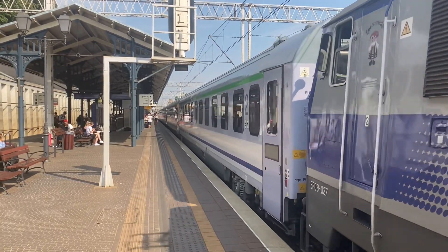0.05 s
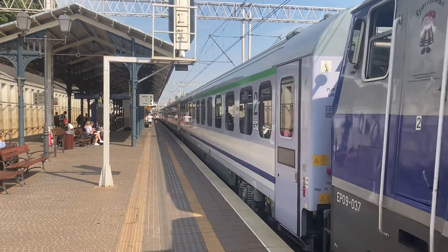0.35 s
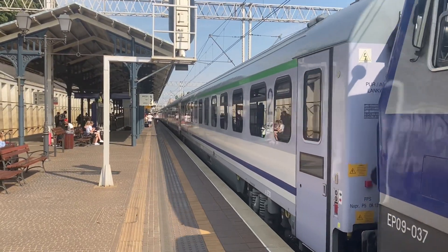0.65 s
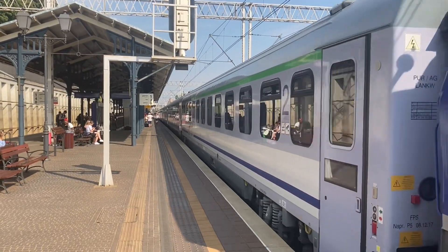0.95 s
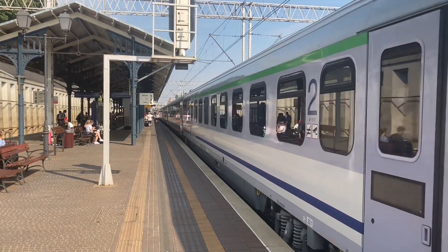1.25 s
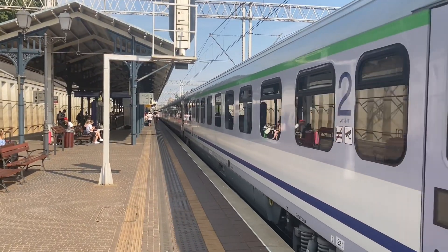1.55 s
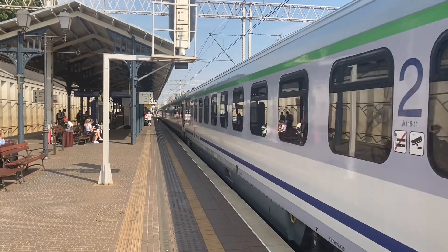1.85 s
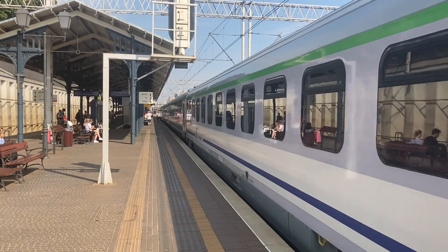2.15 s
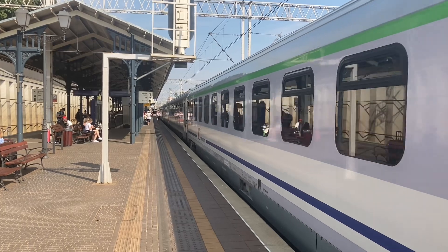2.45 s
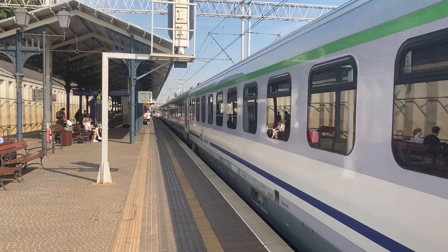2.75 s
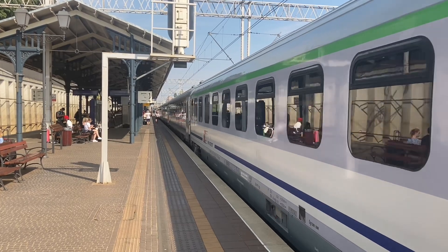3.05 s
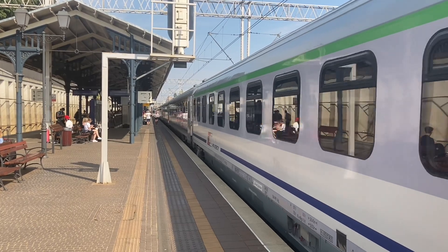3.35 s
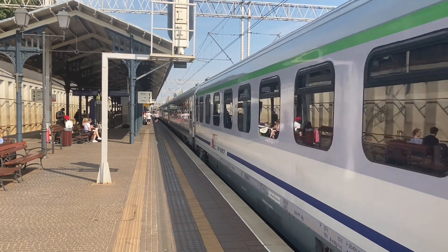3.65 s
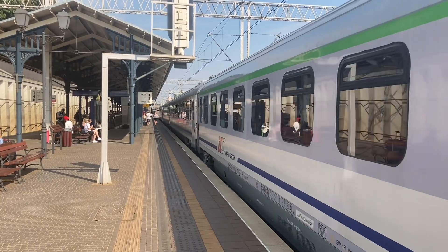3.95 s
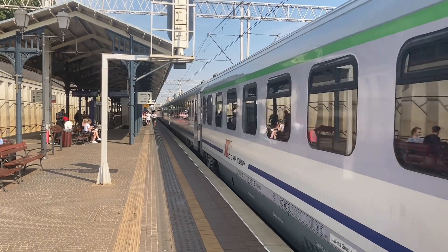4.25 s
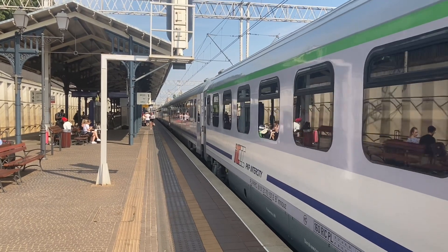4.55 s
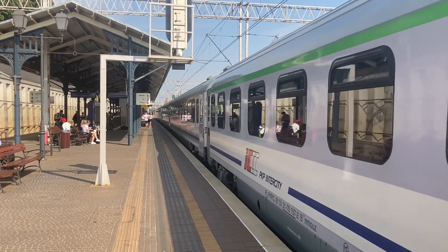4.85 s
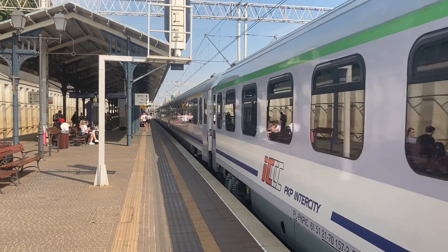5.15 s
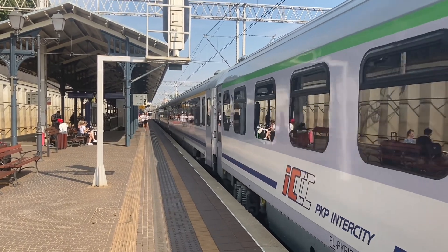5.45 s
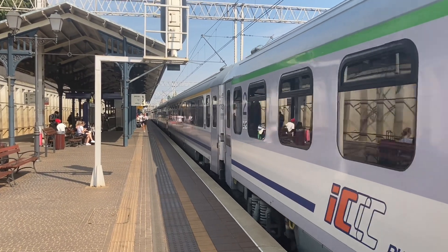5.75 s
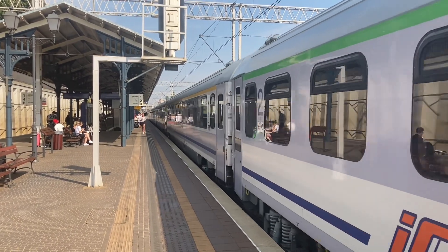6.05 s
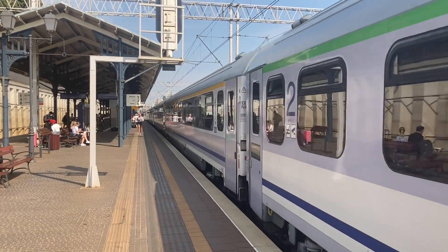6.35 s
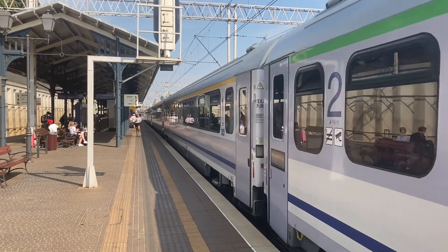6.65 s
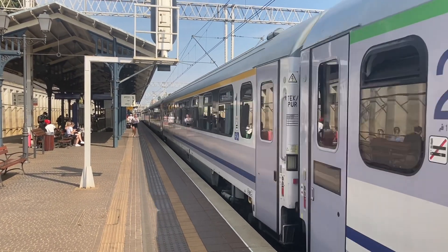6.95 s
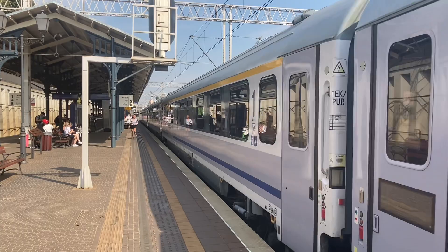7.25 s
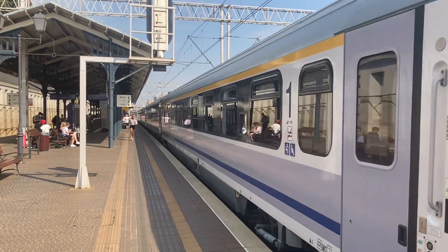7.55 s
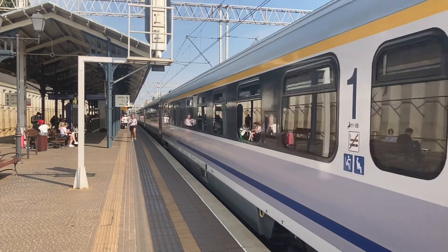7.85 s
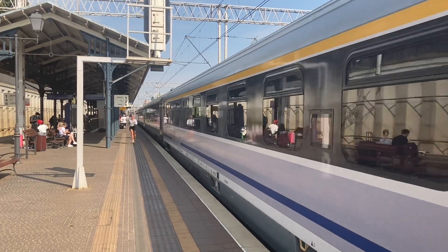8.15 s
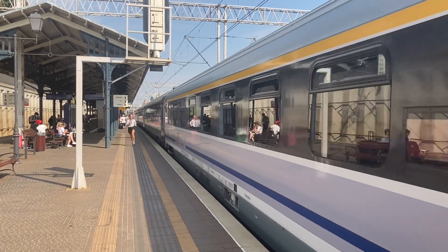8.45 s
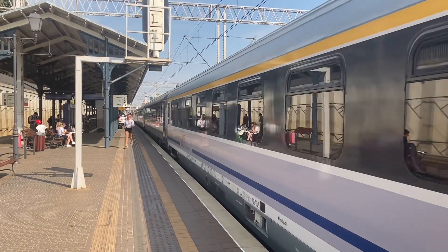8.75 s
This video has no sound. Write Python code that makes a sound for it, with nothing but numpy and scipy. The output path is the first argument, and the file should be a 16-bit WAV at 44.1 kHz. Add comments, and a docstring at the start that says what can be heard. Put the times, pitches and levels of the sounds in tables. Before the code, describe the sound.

Heard in stereo from the platform edge, a passenger train pulls out behind an electric locomotive. First come roaring, whining cooling blowers, with thuds and a brief clatter from the wheels. The roar fades into the softer rumble and rush of coaches, while the motor hum slowly rises and faint electrical tones drift past. Short, gritty wheel squeaks and another rattle come in the last seconds.

```python
"""An electric locomotive pulls a passenger train out of a station, a step from the listener.
First come the air roar and the beating blade tones of two cooling blowers, with knocks and a clatter
as wheels strike flaws in the rail. The locomotive recedes, and the hum of its motors climbs through
the resonances of its body. The coaches follow with rolling rumble and the thin, sinking tones of their
converters. In the last seconds flanges rub the rail and chirp, and the bogies knock and rattle again."""
import sys
import numpy as np
from scipy import signal
from scipy.fft import rfft, irfft, next_fast_len
from scipy.io import wavfile
from scipy.ndimage import uniform_filter1d

SR = 44100
rng = np.random.default_rng(int(sys.argv[2]) if len(sys.argv) > 2 else 0)


def materialize(psi):
    """Save the field psi as 16-bit PCM at rate SR to the path in sys.argv[1].

    A 1-D psi becomes a single channel; in a 2-D psi each row is a channel.
    """
    bounded = np.clip(np.atleast_2d(psi).T, -1, 1)
    quanta = np.round(bounded * 32767).astype(np.int16)
    wavfile.write(sys.argv[1], SR, quanta)


N = 397341
TIME = np.arange(N) / SR
FFT_SIZE = next_fast_len(N)
BIN_HZ = np.maximum(np.arange(FFT_SIZE // 2 + 1) * SR / FFT_SIZE, 1)
METRES_PER_CYCLE = .054  # travel of the train per cycle of the drive's fundamental

# How sound from the track reaches two microphone ports. Each row: frequency in Hz, coherence from
# 0 to 1, phase lead of the left in radians, left minus right level in dB.
PORT_RESPONSE = [(70, .93, -.16, 2.4), (180, .92, -.52, .3), (330, .72, -1.3, -1.1),
                 (600, .66, -2.41, -3.6), (1000, .67, -2.58, -1.8), (1600, .7, -3.45, 1.7),
                 (2200, .28, -5.1, .6), (3000, .1, -6.5, -1.3), (3800, .15, -9.6, .2),
                 (4700, .35, -6.8, .2), (6400, .35, -9.8, -1), (8000, .85, -6.3, 0), (11400, .85, 0, 0),
                 (14700, .85, 6.3, 0)]


def from_db(db):
    """Amplitude ratio for a level in decibels."""
    return 10 ** (np.asarray(db) / 20)


def unit_rms(x):
    """A signal normalised to a mean power of 1."""
    return x / np.sqrt(np.mean(np.abs(x) ** 2) + 1e-20)


def in_time(rows):
    """Linear interpolation of each column of a curve table to every sample."""
    seconds, *columns = np.transpose(rows)
    return [np.interp(TIME, seconds, column) for column in columns]


def at_hz(rows, hz):
    """Interpolation of each column of a spectrum table along a logarithmic frequency axis."""
    points_hz, *columns = np.transpose(rows)
    return [np.interp(np.log(hz), np.log(points_hz), column) for column in columns]


def drift(rate_hz, size=N):
    """Low-pass filtered noise: a random fluctuation with rms near 1."""
    step, settling = 40, 2000  # samples per coarse step; steps for the filter to settle
    pole = np.exp(-2 * np.pi * rate_hz * step / SR)
    white = rng.standard_normal(size // step + settling + 2)
    slow = signal.lfilter([1], [1, -2 * pole, pole * pole], white)[settling:]
    return np.interp(np.arange(size) / step, np.arange(len(slow)), unit_rms(slow))


def scatter(rate_hz, size=N):
    """Multipath fading: many shifting reflections sum to a complex gain of rms 1 at each port."""
    return np.array([drift(rate_hz, size) + 1j * drift(rate_hz, size) for port in range(2)]) / np.sqrt(2)


def phasor(hz):
    """Phase is the integral of frequency; it starts at random, and the real part has rms 1."""
    return np.sqrt(2) * np.exp(2j * np.pi * (np.cumsum(hz) / SR + rng.random()))


def port_gains(hz):
    """Differences of phase and level give direction: a complex gain for the left and right port."""
    _, lead_rad, pan_db = at_hz(PORT_RESPONSE, hz)
    left = from_db(pan_db / 2) * np.exp(.5j * lead_rad)
    return np.array([left, 1 / left]).reshape(2, -1)


def bell(x, centre, half_width):
    """A flat-topped peak of height 1 that falls to one half at half_width from its centre."""
    return 1 / (1 + np.square(np.square((x - centre) / half_width)))


def drive_hz(start_hz=53.9, rise_hz_per_s=5.43):
    """Uniform acceleration: the drive is tied to the wheels, so its fundamental rises linearly."""
    return start_hz + rise_hz_per_s * TIME


def travelled_m():
    """Distance is the integral of speed: how far the locomotive has moved past the listener."""
    return METRES_PER_CYCLE * np.cumsum(drive_hz()) / SR


def noise_spectrum(colour, focus):
    """Partly coherent noise at the two ports; a close source (focus over 1) is more coherent."""
    coherence = np.clip(at_hz(PORT_RESPONSE, BIN_HZ)[0], .01, .99) ** (1 / focus)
    white = rfft(rng.standard_normal((3, FFT_SIZE)))
    pair = np.sqrt(coherence) * white[0] + np.sqrt(1 - coherence) * white[1:]
    low_cut = 1 / np.sqrt(1 + (22 / BIN_HZ) ** 6)
    return pair * port_gains(BIN_HZ) * from_db(at_hz(colour, BIN_HZ)[0]) * low_cut


def noise_band(spectrum, low_hz, high_hz):
    """Band-pass filtering with soft edges turns a spectrum into a noise of rms 1."""
    gain = 1 / np.sqrt((1 + (low_hz / BIN_HZ) ** 12) * (1 + (BIN_HZ / high_hz) ** 12))
    return unit_rms(irfft(spectrum * gain, FFT_SIZE)[:, :N])


def roar_and_rolling():
    """Incoherent sources add in power: the locomotive's air roar gives way to the coaches' wheels."""
    # Noise colours of locomotive and coaches. Each row: frequency in Hz, relative density in dB.
    loco_colour = [(25, -40), (45, 3), (75, 14), (170, -1.5), (230, -4), (370, -3), (680, 3.5),
                   (1200, -9.5), (2000, -16), (3000, -28.5), (4600, -37), (6800, -49.5), (9500, -53),
                   (14500, -58)]
    coach_colour = [(25, -30), (45, -6.5), (70, 2), (170, -3), (290, -8), (400, -11), (600, -10.5),
                    (930, -13), (1150, -18), (1900, -23), (2800, -33), (4800, -44), (6300, -50.5),
                    (13000, -64)]
    # Platform shudder, ground rumble, bogie drone, rail roar, wheel rush, rail hiss and air hiss.
    # Each row: lower and upper edge in Hz, base levels of locomotive and wheels in dB, fade of the
    # wheels in dB per metre.
    bands = [(28, 48, -35, -45, -0.07), (64, 106, -37, -29, 0.17), (131, 355, -23.5, -28.5, 0.1133),
             (346, 968, -27.5, -32, 0.1), (1144, 3470, -31.5, -37.5, 0.0926),
             (3710, 6580, -43.5, -47.5, 0.1644), (7220, 13800, -50, -61, 0.13)]
    # The wheel noise swells or dips as running gear goes by. Each row: time of closest approach in
    # seconds, half duration in seconds, change of the rumble in dB, change of the rush in dB.
    swells = [(.07, .12, 4.5, 2), (0.43, 0.13, 4.5, -3.5), (1.45, 0.17, -3, -0.5), (1.955, 0.49, 1, 1.14),
              (3.75, 0.21, 1, -.5), (5.155, 0.59, -0.5, 0.9), (7.4, 0.32, 0, 0), (7.863, 0.2, -4.5, -0.5),
              (8.405, 1, 2, 1.6)]
    loco, coach = noise_spectrum(loco_colour, focus=1.7), noise_spectrum(coach_colour, focus=0.93)
    rumble_db = sum(db * bell(TIME, nearest_s, half_s) for nearest_s, half_s, db, _ in swells)
    rush_db = sum(db * bell(TIME, nearest_s, half_s) for nearest_s, half_s, _, db in swells)
    metres, out = travelled_m(), 0
    for low_hz, high_hz, loco_db, wheels_db, fade_db_per_m in bands:
        # The hiss holds longer than the roar, then the first coach shuts it off.
        half_power_m, falloff = (2.75, 3.9) if low_hz > 3400 else (2.51, 3.14)
        loco_gain = from_db(loco_db) / np.sqrt(1 + (metres / half_power_m) ** falloff)
        swell_db = rumble_db if high_hz < 120 else rush_db
        wheels_gain = from_db(wheels_db - fade_db_per_m * metres + swell_db)
        level = np.hypot(loco_gain, wheels_gain)
        roar = loco_gain * noise_band(loco, low_hz, high_hz)
        wheels = wheels_gain * noise_band(coach, low_hz, high_hz)
        noise = (roar + wheels) / level
        power = uniform_filter1d(np.mean(noise ** 2, axis=0), size=SR // 10)
        steady_noise = noise / np.sqrt(uniform_filter1d(power, size=SR // 12))
        # Rough wheel treads make the low bands lumpy; the rush stays smoother.
        tread_db = 1.5 if high_hz < 400 else .65
        out = out + steady_noise * level * from_db(tread_db * drift(rate_hz=18.4))
    return out


def blade_tone(hz, centre_db, sideways_db, flutter):
    """Turbulence modulates a blade tone; its sideways part puts the two ports out of phase."""
    arrival = from_db(centre_db) + 1j * from_db(sideways_db) * np.array([[-1], [1]])
    return np.real(phasor(hz) * arrival * unit_rms(1 + flutter * scatter(rate_hz=15)[0]))


def blowers(centre_trim_db=-1.3, sideways_trim_db=-.5, octave_trim_db=-1.2):
    """Beating: two blowers turn at slightly different speeds; the first also sounds its octave."""
    # Blade-passing frequencies. Each row: time in seconds, first blower in Hz, second blower in Hz.
    blade_hz = [(0, 449.6, 463.5), (1.15, 450, 464.5), (1.65, 466, 483), (2.5, 475.5, 491.5),
                (3.5, 475.5, 494), (4.35, 485.5, 503), (5.4, 483, 501), (6.4, 476, 494),
                (7.55, 467.5, 488.5), (8.2, 472.5, 491), (9, 473, 491)]
    # The first blower's tone swells and fades as reflections cross: its part alike at both ports
    # and its part arriving sideways. Each row: time in seconds, relative level in dB.
    first_centre = [(0.0, -26), (.12, -25.5), (.22, -34), (.38, -46), (.51, -29), (.6, -37), (.7, -28),
                    (.78, -35), (.87, -29), (1.06, -32), (1.38, -50), (1.6, -34), (2.24, -34.5),
                    (2.36, -27), (2.48, -42), (2.6, -27.5), (2.96, -34), (3.15, -28.5), (3.24, -46),
                    (3.36, -35), (4.04, -47), (4.24, -30), (4.32, -42), (4.45, -31), (4.56, -39.5),
                    (4.76, -27.5), (5.02, -48), (5.5, -29), (5.72, -27), (5.8, -46), (5.96, -26.5),
                    (6.08, -44), (6.24, -31), (6.44, -43), (6.56, -33), (6.7, -42), (6.8, -33), (6.92, -44),
                    (7.14, -30.5), (7.36, -34.5), (7.46, -47), (7.76, -32), (7.84, -45.5), (7.92, -33.5),
                    (8.12, -44.5), (9.0, -44)]
    first_sideways = [(0.0, -20), (0.42, -33), (.95, -26), (1.38, -37), (1.88, -23), (2.15, -24),
                      (2.5, -35), (2.65, -31.5), (3.3, -31), (3.5, -36), (3.63, -25), (3.72, -35),
                      (3.86, -25), (4.0, -37), (4.16, -42), (4.44, -22), (4.57, -33), (4.88, -27),
                      (5.02, -42), (5.38, -28), (5.58, -43), (5.73, -25), (5.85, -46), (6.05, -35),
                      (6.37, -44), (6.55, -31), (7.2, -46), (7.45, -35), (7.85, -41), (7.93, -32),
                      (8.06, -33), (8.42, -43), (8.6, -34), (9.0, -40)]
    # Its octave and the second blower's tone. Each row: time in seconds, relative level alike at
    # both ports in dB, relative level arriving sideways in dB.
    octave_levels = [(0.0, -42, -30), (.09, -35, -22.5), (0.3, -32, -26), (0.42, -42, -33), (.8, -48, -35),
                     (1.2, -52, -39), (1.72, -54, -50), (1.86, -37.5, -35.5), (2.04, -56, -48),
                     (2.17, -37.5, -37), (2.46, -52, -40), (2.7, -37.5, -42), (2.86, -48, -48),
                     (2.96, -42, -46), (3.08, -52, -50), (3.24, -41, -35.5), (3.32, -47, -46),
                     (3.42, -41, -35.5), (3.54, -52, -48), (3.66, -44, -43), (3.85, -56, -50),
                     (5.4, -54, -54), (5.65, -56, -40), (5.8, -58, -52), (6.3, -56, -50), (6.52, -45, -46),
                     (6.68, -56, -52), (6.82, -45, -48), (7.08, -54, -39), (7.25, -54, -52),
                     (7.55, -54, -45), (7.72, -44, -44), (7.95, -57, -52), (8.16, -42.5, -42),
                     (8.3, -53, -42), (8.7, -54, -44), (8.82, -41, -36), (9.0, -46, -46)]
    second_levels = [(0, -38, -27), (.2, -38, -25), (1.1, -46, -38), (1.27, -42, -29.5), (1.9, -44, -44),
                     (2.25, -39.5, -33), (2.7, -43, -48), (3.07, -44, -34), (3.35, -39, -40),
                     (4.1, -49, -34), (4.7, -38, -34.5), (4.88, -46, -43), (5.14, -48, -33),
                     (5.6, -39, -43), (5.95, -52, -49), (6.25, -36.5, -36), (6.6, -46, -42),
                     (6.85, -37, -37), (7.08, -39, -34), (7.45, -46, -48), (8.1, -50, -36), (8.5, -41, -40),
                     (9, -50, -41)]
    # Apparent direction of the two fundamentals. Each row: time in seconds, left minus right in dB.
    direction = [(0, -0.5), (1.9, 0), (2.35, 6.5), (3.1, 2.5), (3.55, -2), (4.8, -2), (5.7, -1), (6.5, 0),
                 (9, 0)]
    first_hz, second_hz = (hz * (1 + 0.00078 * drift(rate_hz=2.66)) for hz in in_time(blade_hz))
    centre_db = in_time(first_centre)[0] + centre_trim_db
    sideways_db = in_time(first_sideways)[0] + sideways_trim_db
    first = blade_tone(first_hz, centre_db, sideways_db, flutter=.3)
    octave = from_db(octave_trim_db) * blade_tone(2 * first_hz, *in_time(octave_levels), flutter=.6)
    second = blade_tone(second_hz, *in_time(second_levels), flutter=.3)
    pan = from_db(in_time(direction)[0] * np.array([[.5], [-.5]]))
    return octave + (first + second) * pan


def traction_drive(waver_db=1.1, flutter=.4):
    """Resonance: the rising harmonics of motors and gears boom in each body mode they cross."""
    # Harmonics from the fundamental up. Each row: base level in dB, fade in dB per metre.
    harmonics = [(-36, 0.05), (-35.5, 0.1), (-30.5, 1), (-44.5, 0.04)]
    # Resonances of the body. Each row: centre in Hz, half width in Hz, boost in dB.
    resonances = [(74.4, 1.2, 7.5), (88.7, 1.8, 5), (94.3, 1.3, 9.5), (115, 0.9, 8), (127.5, 1.9, 3),
                  (136.6, 2.4, 9), (164, 8.6, 6), (177.6, 2.2, 2.5), (192, 4.2, 1.7), (222.1, 6.8, 10.5)]
    metres, out = travelled_m(), 0
    for order, (base_db, fade_db_per_m) in enumerate(harmonics, 1):
        hz = order * drive_hz()
        boom_db = sum(db * bell(hz, centre_hz, half_hz) for centre_hz, half_hz, db in resonances)
        level = from_db(base_db - fade_db_per_m * metres + boom_db + waver_db * drift(rate_hz=0.86))
        hum = phasor(hz) * port_gains(hz.mean())
        shake = unit_rms(1 + flutter * scatter(rate_hz=7)[0])  # jolts of the track
        out = out + level * np.real(hum * shake)
    return out


def narrow_tone(hz, width_hz, gain, diffuse):
    """Interference: a wandering tone arrives directly and by reflections of relative size diffuse."""
    out, audible = np.zeros((2, N)), gain > gain.max() / 200
    size = audible.sum()
    tone = phasor(np.broadcast_to(hz, N)[audible] + .5 * width_hz * drift(width_hz, size))
    arrival = unit_rms(port_gains(np.mean(hz)) + diffuse * scatter(width_hz, size))
    out[:, audible] = gain[audible] * np.real(tone * arrival)
    return out


def passing_tones(glide_s=.9, sound_m_per_s=343):
    """Doppler effect: each tone swells as its source comes near and sinks in pitch as it goes by."""
    # Tones of converters, fans and panels, and near 8.2 s the scrape of wheels at about 1.8 and # 2.4 kHz. Each
    # row: time of closest approach in seconds, half duration in seconds, frequency in Hz, # width in Hz, peak
    # level in dB.
    tones = [(0.18, 0.27, 1337, 15, -52), (.15, .14, 730, 11.5, -36), (0.297, 0.33, 2350, 320, -43.5),
             (0.91, 0.08, 357, 18, -26.5), (.62, .15, 550, 19.4, -30), (0.9, 0.0405, 315, 10, -27.5),
             (0.79, 0.27, 4200, 122, -48), (.88, 0.19, 4100, 200, -50), (1.27, .1, 680, 50, -34.5),
             (0.93, 0.4, 2090, 520, -38), (1.898, .55, 1616, 600, -42), (2.294, 1, 4640, 390, -53.5),
             (4.099, 1.9, 4810, 304, -56.5), (4.2, .3, 4000, 90, -64), (8.9, .08, 4700, 390, -57),
             (4.902, 1.02, 3000, 17, -58), (5.0, 0.56, 1524, 7.7, -55), (5.9, .9, 5200, 8, -67),
             (5.5, 1.1, 14500, 220, -67.5), (6.04, .93, 149, 1.16, -38.5), (6.906, 2.0, 240.5, 2.7, -43.5),
             (8.202, .8, 1842, 40, -53), (8.63, .13, 203, 7.5, -32), (8.199, 0.51, 2360, 199, -52)]
    mach, out = METRES_PER_CYCLE * drive_hz() / sound_m_per_s, 0
    for nearest_s, half_s, hz, width_hz, level_db in tones:
        doppler = 1 - mach * (TIME - nearest_s) / np.hypot(TIME - nearest_s, glide_s)
        gain = from_db(level_db) * bell(TIME, nearest_s, half_s)
        out = out + narrow_tone(hz * doppler, width_hz, gain, diffuse=1.07)
    return out


def clatters(contacts_per_s=900, ring_band_hz=(430, 1400)):
    """Shot noise: after a jolt, loose brake rigging makes a dying shower of small metal contacts."""
    # Jolts of the rigging. Each row: start in seconds, level in dB, time to fall 60 dB in seconds.
    jolts = [(.293, -26, .1), (7.668, -35, .25), (7.733, -28, .42)]
    envelope = sum(from_db(db - 60 * np.maximum(TIME - start_s, 0) / t60) * (TIME >= start_s)
                   for start_s, db, t60 in jolts)
    contacts = (rng.random(FFT_SIZE) < contacts_per_s / SR) * rng.standard_normal(FFT_SIZE)
    paths = port_gains(BIN_HZ) + scatter(0.11, len(BIN_HZ))  # direct sound plus reflections
    shower = irfft(rfft(contacts) * paths, FFT_SIZE)[:, :N]
    band = signal.butter(4, ring_band_hz, "band", fs=SR, output="sos")
    return signal.sosfilt(band, envelope * shower + 1e-18) / np.std(signal.sosfilt(band, shower))


def knocks(contact_s=0.004):
    """Impact excitation: a wheel jolts over a flaw in the rail and the bogie's damped modes ring."""
    # Wheel impacts. Each row: start in seconds, relative level in dB, treble roll-off corner in Hz.
    impacts = [(0.294, -26, 1820), (0.443, -6.5, 258), (0.508, -5, 150), (.905, -8, 200), (1.774, -16, 320),
               (5.462, -9, 125), (7.674, -28, 1510), (7.733, -25.5, 2200), (7.775, -30, 2200),
               (8.018, -10, 135)]
    # Bogie modes. Each row: frequency in Hz, relative level in dB, time to fall 60 dB in seconds.
    modes = [(69, -11, 0.055), (130, -5, 0.12), (155, 4, 0.082), (323, -6, 0.13), (473, -2, 0.25),
             (696, -4, 0.22), (921, 5, 0.15), (1240, -17, .18), (1730, -14, .2), (2330, -21, 0.22)]
    out, age = np.zeros((2, N)), np.arange(SR // 2) / SR
    attack = 1 - np.exp(-age / contact_s)
    for start_s, level_db, corner_hz in impacts:
        ring = 0
        for (hz, mode_db, t60), phase in zip(modes, rng.random(len(modes))):
            envelope = from_db(level_db + mode_db - 60 * age / t60) / (1 + (hz / corner_hz) ** 2)
            ring = ring + envelope * np.real(port_gains(hz) * np.exp(2j * np.pi * (hz * age + phase)))
        start = int(start_s * SR)
        out[:, start:start + len(age)] += (ring * attack)[:, :N - start]
    return out


def flange_squeals(trim_db=-4.8, grit_db=-4, flicker_db=2.5, slips_per_s=70):
    """Stick-slip friction: flanges rub the rail and make the wheels sing in short, gritty chirps."""
    # Wheel chirps. Each row: time of the peak in seconds, half duration in seconds, frequency in Hz,
    # relative level in dB.
    chirps = [(6.62, .055, 2250, -49), (6.795, .035, 2265, -42), (7.22, .09, 2255, -47.5),
              (7.32, .08, 2260, -44), (7.351, 0.21, 1820, -52), (7.75, 0.07, 2240, -47),
              (7.791, 0.042, 1770, -44.5), (8.134, 0.036, 2370, -48), (8.2, .12, 1855, -51),
              (8.46, .07, 2385, -44), (8.625, .04, 1840, -42.5), (8.8, .05, 2390, -46.5),
              (8.83, .06, 1830, -43), (8.949, .06, 2380, -49)]
    out = 0
    for peak_s, half_s, hz, level_db in chirps:
        gain = from_db(level_db) * bell(TIME, peak_s, half_s)
        tone = narrow_tone(hz, width_hz=24, gain=gain, diffuse=0.8)
        grit = narrow_tone(hz, width_hz=110, gain=gain * from_db(grit_db), diffuse=0.68)
        out = out + tone + grit
    return out * from_db(trim_db + flicker_db * drift(slips_per_s))


def scene():
    """Superposition: all the sources of the train add at the platform edge."""
    sustained = roar_and_rolling() + blowers() + traction_drive() + passing_tones()
    return sustained + flange_squeals() + knocks() + clatters()


def record(dry):
    """An elliptic low-pass filter cuts the treble steeply above 15.3 kHz."""
    return signal.sosfilt(signal.ellip(10, .1, 90, 15300, fs=SR, output="sos"), dry)


dry = scene()
out = record(dry)
materialize(out)
```